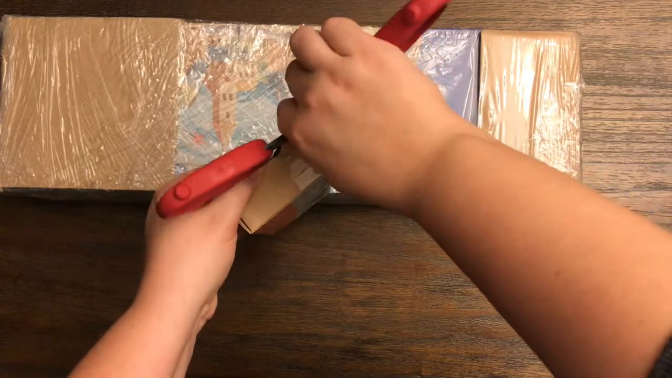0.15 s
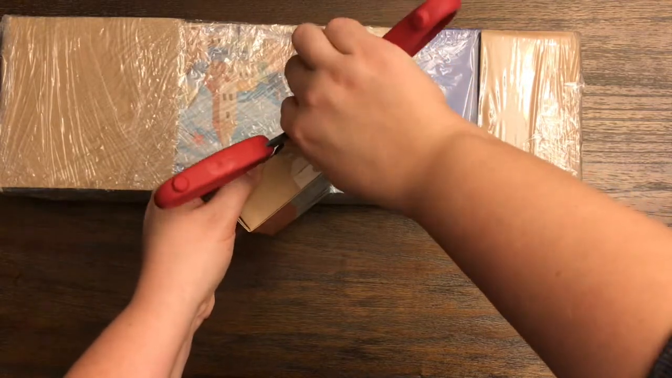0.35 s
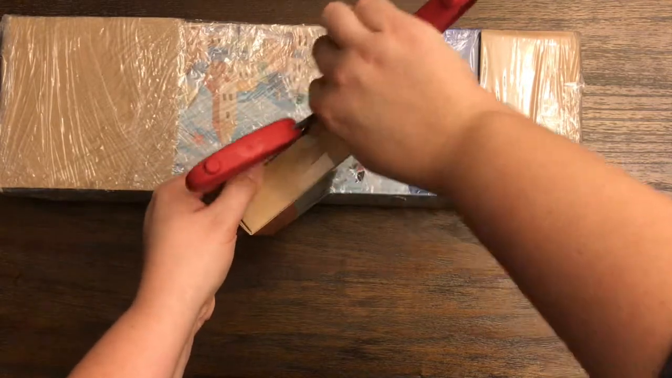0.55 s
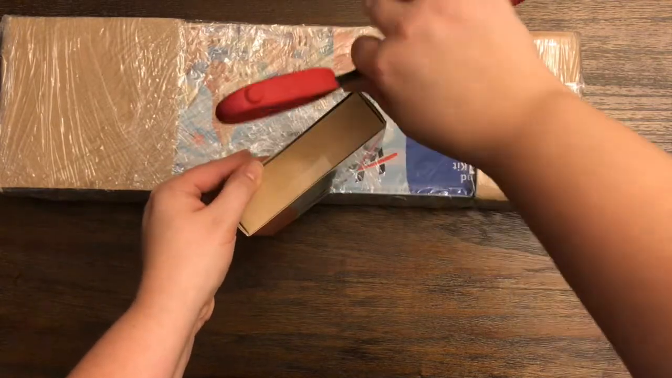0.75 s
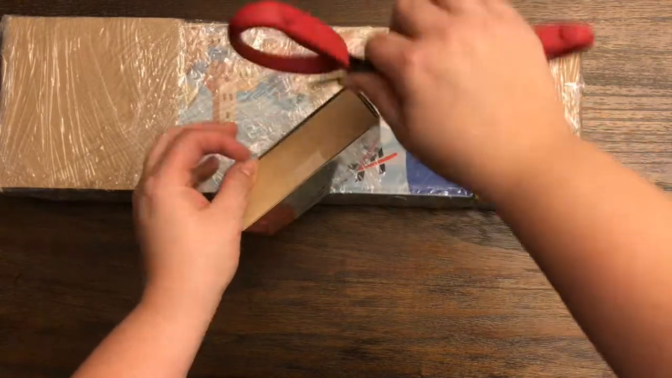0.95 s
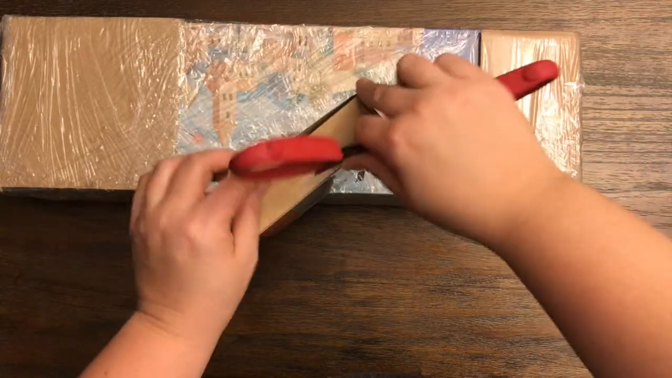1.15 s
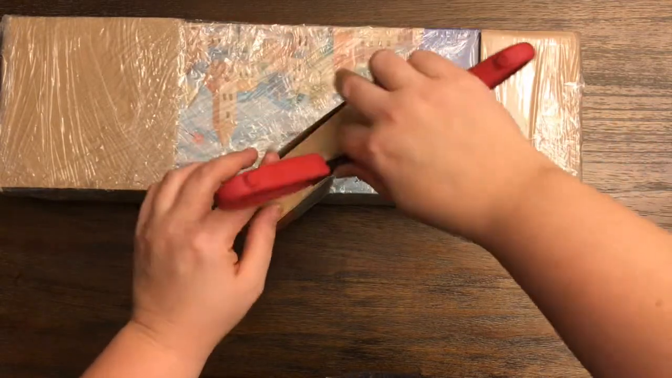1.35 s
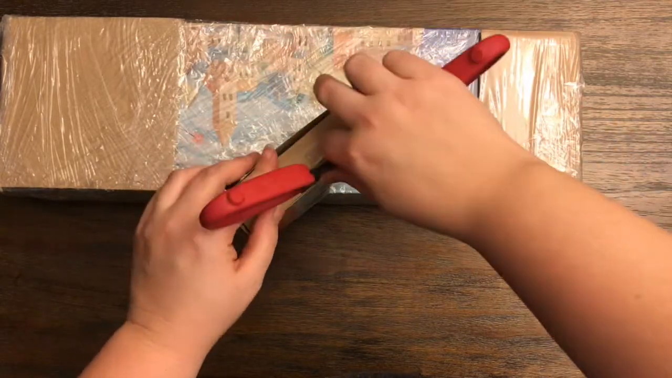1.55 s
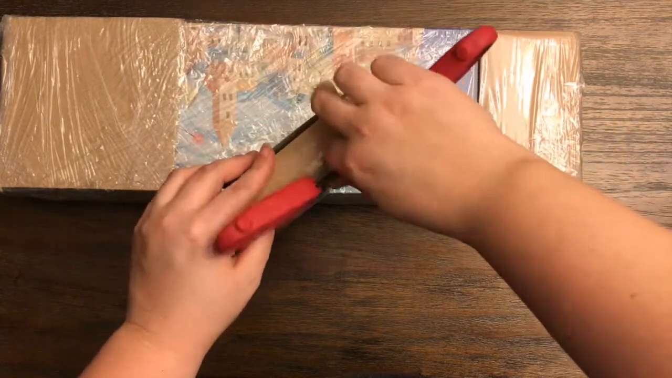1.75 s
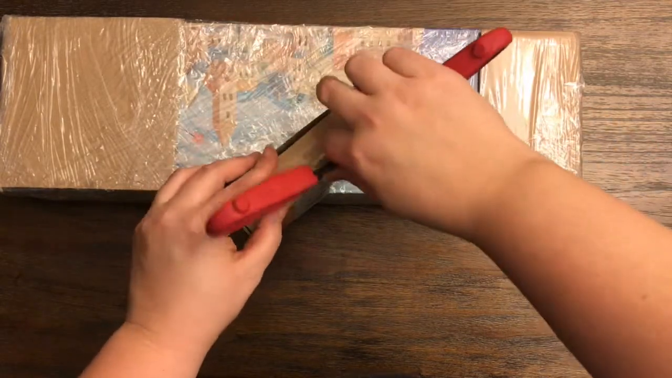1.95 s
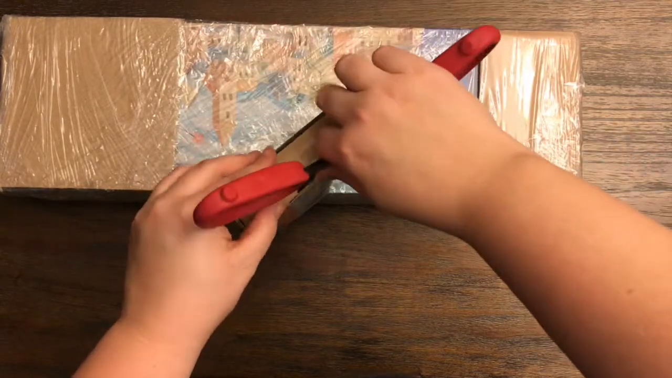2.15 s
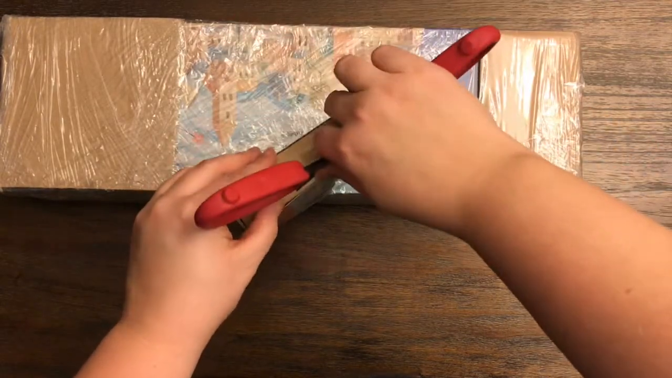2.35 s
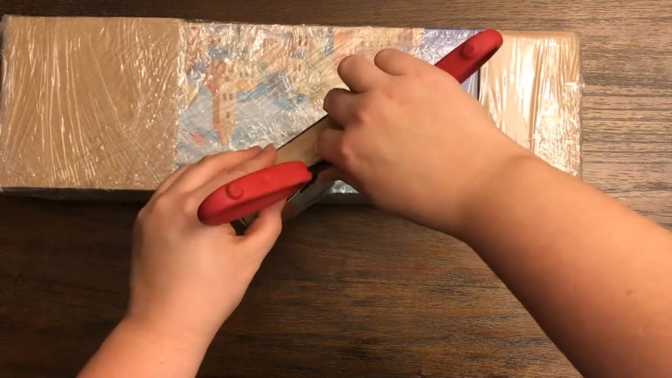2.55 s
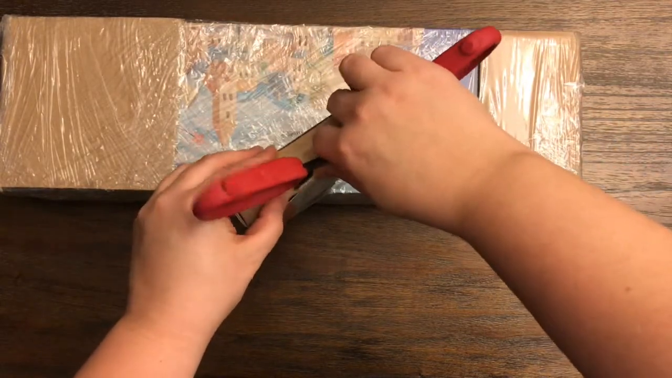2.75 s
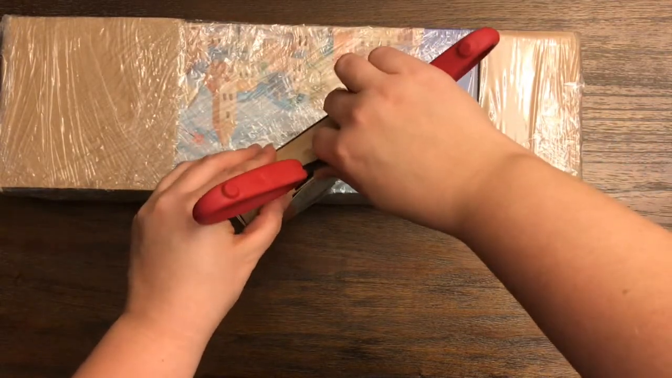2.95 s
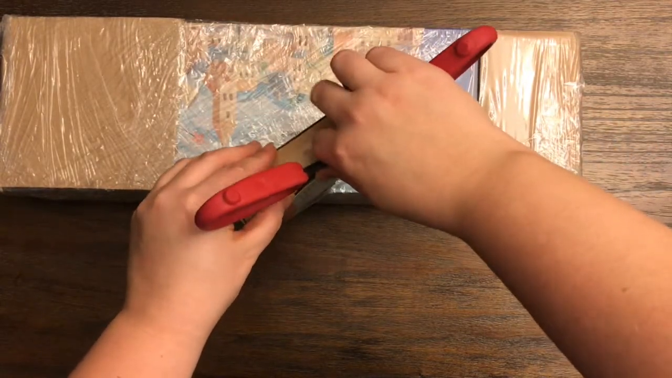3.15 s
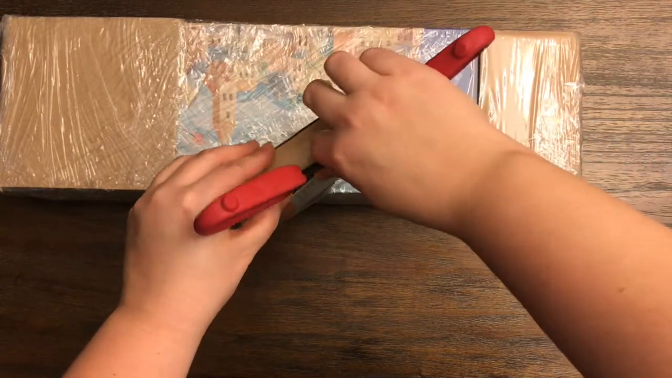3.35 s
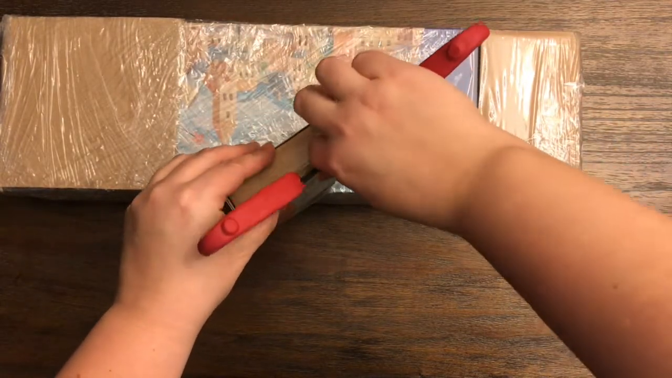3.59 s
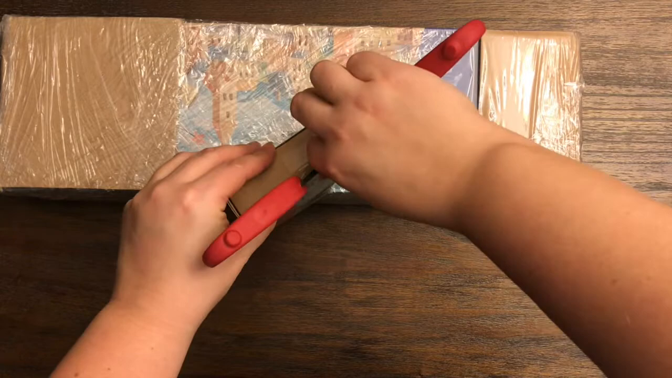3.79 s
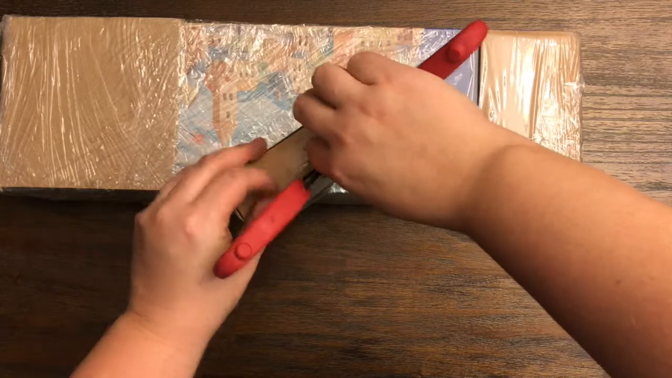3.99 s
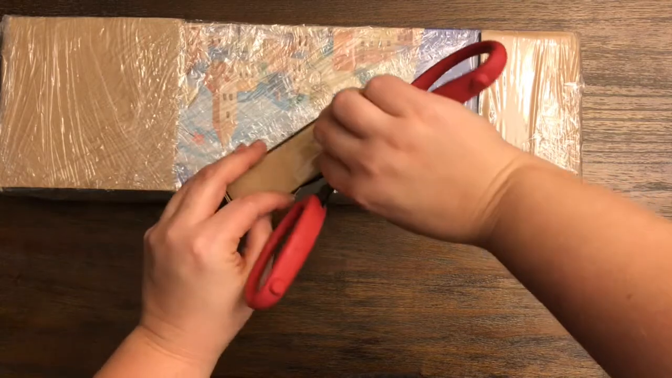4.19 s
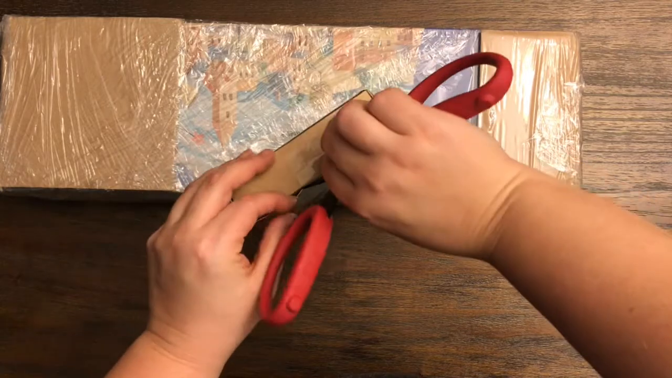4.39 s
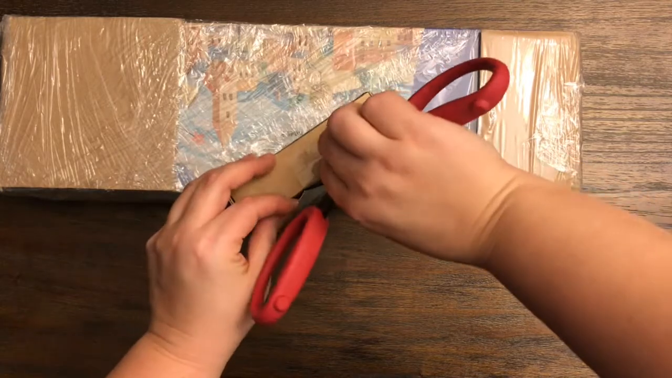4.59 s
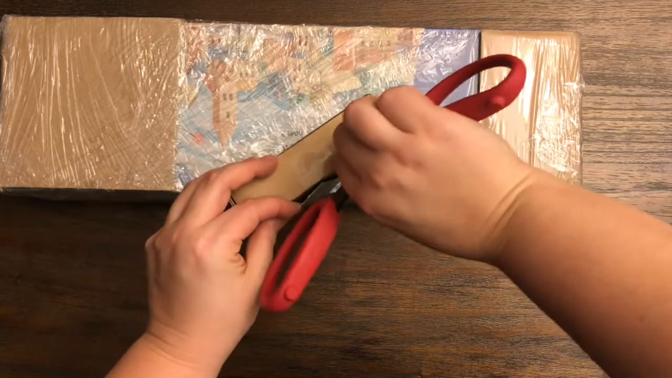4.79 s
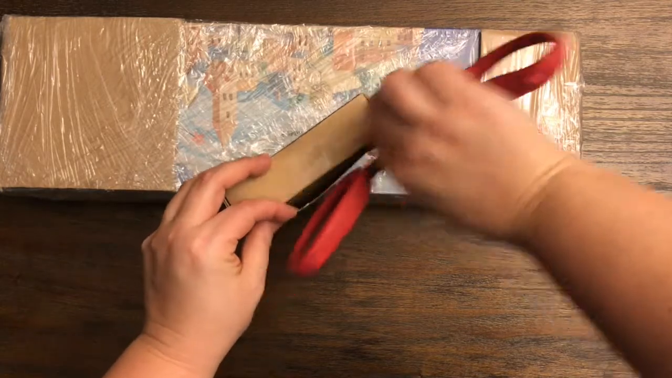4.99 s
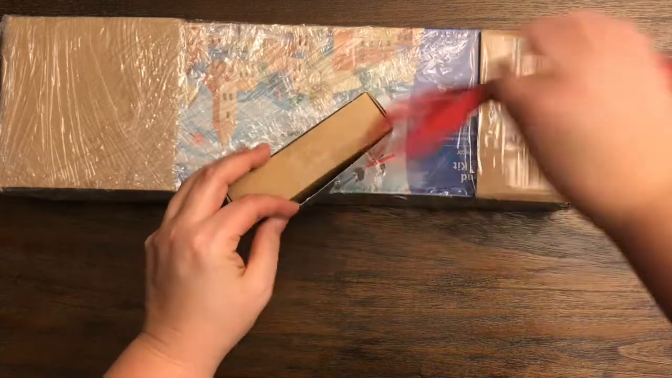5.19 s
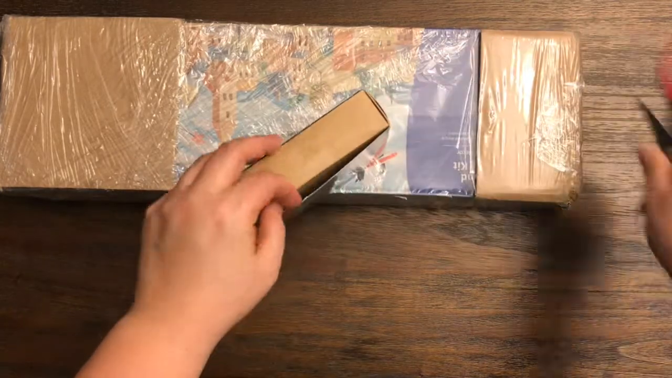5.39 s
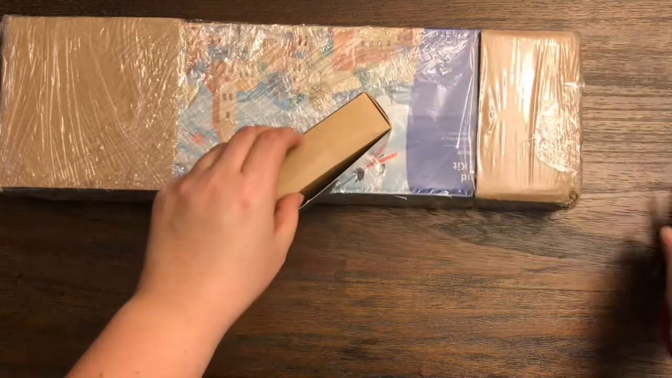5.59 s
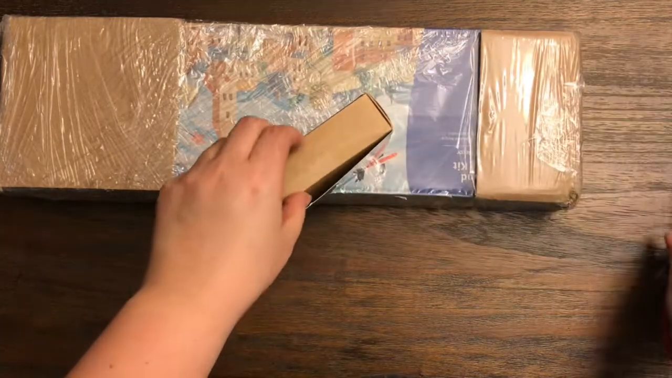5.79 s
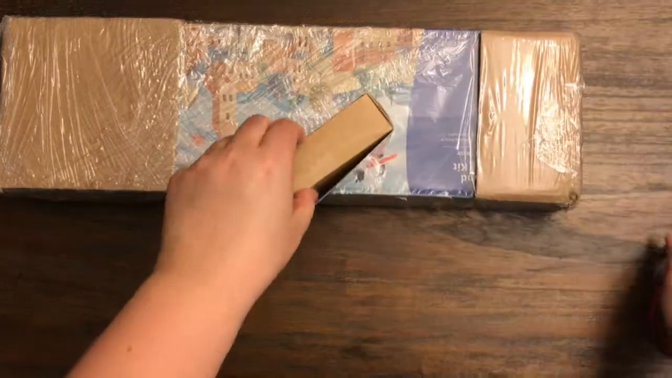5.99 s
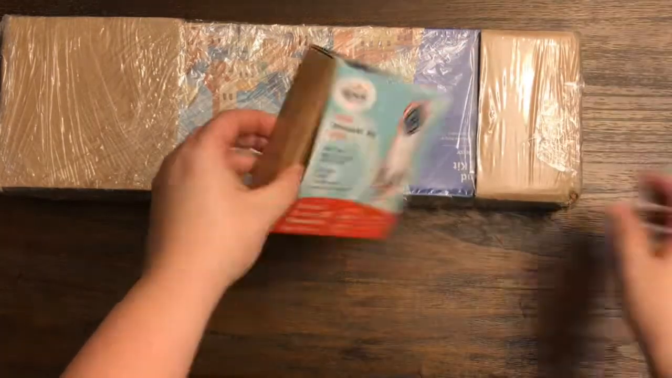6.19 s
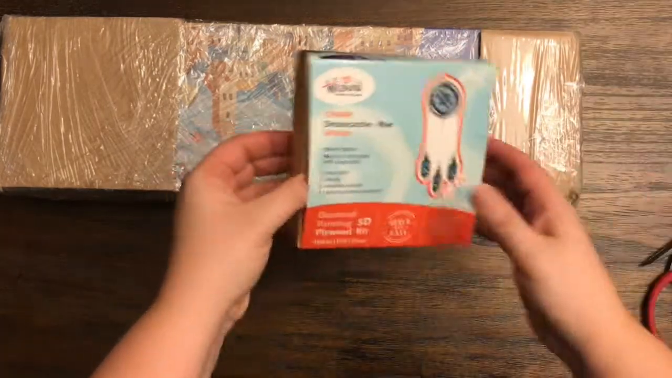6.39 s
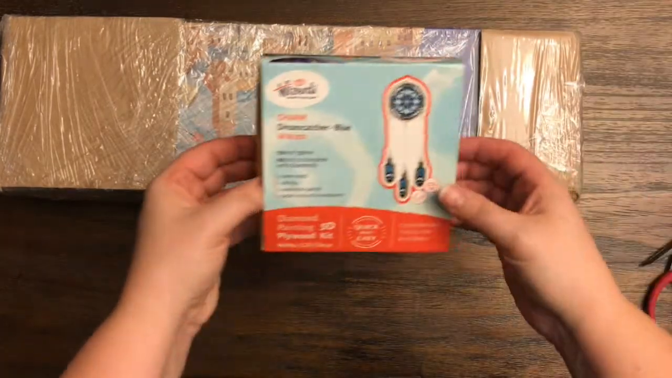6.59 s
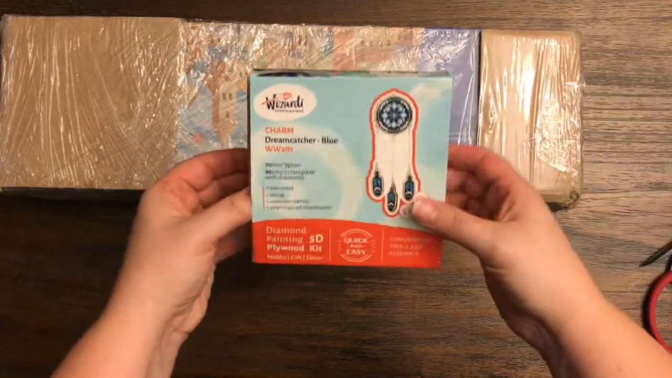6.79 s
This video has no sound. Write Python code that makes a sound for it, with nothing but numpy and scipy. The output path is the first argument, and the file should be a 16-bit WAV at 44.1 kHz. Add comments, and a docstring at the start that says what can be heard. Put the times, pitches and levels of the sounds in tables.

```python
"""A low appliance hum in a quiet room, then scissors close by, working through tape on a cardboard box.
Tape snaps and rasps as cracking noise and stick-slip jerks, the flap thuds and the blade rings as
decaying modes, and the blade squeaks as it is drawn out: jerks in a narrow, rising resonance.
Then the box is tipped up: it scuffs over the parcel beneath and its contents knock about.
Filtered noise makes the rustles, soft hiss and faint ticks; a diffuse noise tail makes the room."""
import sys
import numpy as np
from scipy import signal
from scipy.fft import rfft, irfft
from scipy.io import wavfile

SR = 44100
rng = np.random.default_rng(int(sys.argv[2]) if len(sys.argv) > 2 else 0)


def bounce(signal):
    """Save signal as a 16-bit WAV file at the path given by the first command-line argument."""
    frames = np.transpose(np.atleast_2d(signal))
    limited = np.clip(frames, -1, 1)
    pcm = np.round(limited * 32767).astype(np.int16)
    wavfile.write(sys.argv[1], SR, pcm)


N = 301672  # length in samples

# motor and mains hum together: f/Hz, level/dB rms
HUM = [(57.5, -59.5), (60, -69), (115, -65), (120, -73.5), (172.5, -74), (230, -83), (287.5, -108)]
# spectrum of the still air and hiss: f/Hz, relative level/dB per Hz
AIR = [(20, -25), (35, -11), (65, -6), (100, -7), (210, -13.5), (340, -13.5), (520, -24), (1000, -28),
       (1700, -31), (2200, -35.5), (2900, -37.5), (3800, -37), (5500, -41), (10500, -45.5), (12500, -41.5),
       (14500, -36.5), (15800, -36.5)]
AIR_DB = -59.5  # rms

# tape snaps and blade clicks: t/s, crack level/dB, flap thud level/dB, tick level/dB, favoured flap f/Hz
SNAPS = [(.166, -88, -55, -62.5, 197), (.4605, -62, -66, -58, 226), (.4645, -43, -37.5, -35, 226),
         (.4683, -39.5, -36, -32.5, 150), (.4701, -50, -39, -35, 187), (.6846, -39.5, -36.5, -40.5, 690),
         (.7868, -58, -74, -58.5, 180), (.9876, -64, -68, -55.5, 157), (1.039, -86, -80, -48, 141),
         (1.7259, -54, -52, -50.5, 188), (1.8416, -62, -58, -66, 130), (2.2272, -59, -48, -57, 524),
         (2.3612, -72, -66, -56, 130), (2.3655, -70, -61, -48.5, 130), (2.3731, -66, -72, -47.5, 130),
         (2.576, -58, -48, -53, 296), (2.8214, -78, -49, -58, 176), (3.055, -67, -51, -66, 205),
         (3.1042, -68, -60, -67.5, 200), (3.1965, -60, -58, -69, 270), (3.4374, -62.5, -58.5, -65.5, 560),
         (3.4645, -62.5, -53, -69, 570), (3.8734, -55, -56.5, -65, 397), (3.884, -62, -62, -81, 1000),
         (4.0119, -77, -68, -56.5, 170), (4.0453, -60, -68, -58.5, 130), (4.212, -60, -60, -70, 590),
         (4.222, -69, -69, -80, 700), (4.3291, -60, -59, -71, 160), (4.7595, -64, -44.5, -59, 201),
         (4.9885, -44, -37.5, -33, 620), (5.0195, -36, -30.5, -42, 452), (5.4156, -63, -57, -53.5, 130)]
# modes of the taped flap: f/Hz, level/dB, t60/s
FLAP_MODES = [(116, -10.5, 0.12), (138, -5.5, 0.082), (178.5, -5.5, 0.14), (211, 0.5, 0.045),
              (299, 1, 0.059), (400, 5.5, 0.026), (571, -0.5, 0.031), (618, 7, 0.013), (850, -3, 0.037),
              (1150, 5.5, 0.0054), (1470, 10.5, 0.01)]
# colour of cracking tape: f/Hz, level/dB
TAPE_CRACK = [(300, -61), (800, 9), (1150, 6.5), (1550, 10), (2300, 1), (3300, 3), (4300, -0.5),
              (6000, -31), (9000, -61)]
# colour of the fine ticking of edge and film: f/Hz, level/dB
TICK = [(2500, -12.5), (5000, -2), (6500, 1), (8200, -0.5), (9700, 0.5), (11000, -4), (12500, 0.5),
        (16000, -2)]
SNAP_T60_S, SNAP_TICK_T60_S = 0.032, 0.0088
BITE_S = 0.00033  # time constant of a blow's build-up
ROOM_T60_S, ROOM_TREBLE_T60_S, ROOM_DB = 0.47, 0.12, -15

# steel blade ringing as it jumps free: t/s, level/dB, strongest f/Hz
BLADE_RINGS = [(.4688, -38, 1480), (.6846, -46, 2300), (4.9895, -36.5, 3280), (5.004, -48, 3500)]
# modes of the blade: f/Hz, level/dB, t60/s
BLADE_MODES = [(1330, 3, 0.012), (1470, 3, 0.012), (2250, -4, 0.01), (3190, 2, 0.016), (3370, 2, 0.016),
               (3900, -1, 0.01), (4380, -1, 0.012), (6300, -4, 0.008)]

# edge biting and tape tearing on: t/s, length/s, crest as share of length, rasp level/dB,
# flap level/dB, favoured flap f/Hz
CUTS = [(0.472, 0.022, 0.16, -44.5, -34.5, 161), (0.501, 0.034, 0.37, -51, -40.5, 190),
        (0.688, 0.047, 0.16, -42, -43.5, 710), (2.642, 0.05, 0.1, -58.5, -55, 440),
        (3.18, 0.063, 0.44, -65, -52, 298), (4.756, 0.07, 0.32, -55, -51.5, 398),
        (5.017, 0.091, 0.12, -48, -53, 560)]
# hiss equals rasp at this level, and lags by this many dB for each dB less
CUT_BRIGHT_DB, CUT_DULLING = -49.5, 0.28

# soft hiss lingering after snips: t/s, length/s, level/dB
LINGER = [(0.49, 0.92, -62), (5.044, 1, -61.5)]
# colour of that hiss: f/Hz, level/dB per Hz
LINGER_COLOUR = [(400, -14), (1500, 8), (3500, 1.5), (6500, -1), (10000, -2.5), (16000, -5)]
LINGER_CREST_SHARE = 0.025  # of the length

# flat of the blade gliding over film: t/s, length/s, crest as share of length, hiss level/dB, flap level/dB
SLIDES = [(0.958, 0.12, 0.46, -63, -68), (1.219, 0.18, 0.57, -59.5, -68), (1.771, 0.034, 0.68, -59, -70),
          (2.327, 0.058, 0.5, -60.5, -75), (2.781, 0.08, 0.32, -76, -59), (3.439, 0.04, 0.32, -64, -61),
          (3.968, 0.028, 0.28, -62.5, -83), (3.978, 0.29, 0.25, -66, -60), (4.175, 0.072, 0.7, -62, -67),
          (4.22, 0.22, 0.23, -65.5, -56), (4.953, 0.094, 0.42, -49.5, -52), (5.039, 0.1, 0.91, -53.5, -71)]
SLIDE_RASP_DB, SLIDE_HZ = -1, 360  # rasp relative to hiss, favoured flap pitch

# film pushed aside: t/s, length/s, crest as share of length, level/dB, lower edge f/Hz, upper edge f/Hz
FILM_RUSTLES = [(1.18, 0.09, 0.88, -66.5, 2520, 4140), (1.226, 0.14, 0.24, -56.5, 7400, 14200),
                (1.27, 0.088, 0.18, -59, 2200, 7900), (1.461, 0.065, 0.08, -59.5, 1660, 3300),
                (2.35, 0.064, 0.23, -57, 6000, 9800), (2.643, 0.046, 0.078, -58.5, 1860, 4350),
                (4.235, 0.091, 0.3, -71, 2400, 3860), (6.46, 0.15, 0.26, -67, 2020, 3980)]
# colour of rustling film: f/Hz, level/dB
FILM_RUSTLE = [(1500, -3), (3000, -5.5), (6000, 1.5), (12000, 4), (16000, 1)]

# stiff tape buckling in quick crinkles: t/s, level/dB, strongest f/Hz
CRINKLES = [(1.4615, -61, 3000), (2.624, -60, 3800), (2.632, -70, 4200), (2.6455, -58, 3000),
            (2.654, -56, 3600), (2.661, -66, 1500)]
# modes of the buckling tape: f/Hz, level/dB, t60/s
FILM_MODES = [(864, 4, 0.13), (1535, 8, .035), (1800, -12, 0.024), (2190, 0, 0.053), (2430, 4, 0.028),
              (3080, -17, 0.02), (3390, -1, 0.035), (3900, -4, 0.029), (4300, -2, 0.033)]

# card and contents rustling: t/s, length/s, crest as share of length, level/dB,
# lower edge f/Hz, upper edge f/Hz
CARD_RUSTLES = [(1.773, 0.022, 0.74, -48.5, 200, 1130), (2.54, 0.069, 0.6, -53.5, 217, 800),
                (2.64, 0.056, 0.31, -62, 400, 2200), (4.195, 0.05, 0.38, -50, 254, 1700),
                (4.756, 0.084, 0.16, -45.5, 153, 1210), (4.957, 0.052, 0.86, -42.5, 149, 1400),
                (5.022, 0.062, 0.1, -46, 120, 900), (5.921, 0.078, 0.13, -40, 550, 3400),
                (5.993, 0.043, 0.16, -30, 590, 2490), (6.016, 0.06, 0.12, -29, 248, 2630),
                (6.055, 0.075, 0.36, -37.5, 240, 2360), (6.13, 0.088, 0.052, -40.5, 222, 1950),
                (6.195, 0.095, 0.17, -42.5, 153, 764)]
# colour of rustling card: f/Hz, level/dB
CARD_RUSTLE = [(120, -2), (210, 10), (300, 4), (480, -3), (690, 0), (1000, -7), (1350, -1), (1600, -8),
               (2000, -4.5), (3000, -15)]

# span of the stray ticks of strained tape: start t/s, end t/s
CRACKLE_S = (1.9, 4.9)
CRACKLE_PER_S, CRACKLE_DB, CRACKLE_SPREAD_DB = 6, -74, 1.5

# knocks of box and contents: t/s, crack level/dB, box thud level/dB, tick level/dB, struck wall f/Hz
KNOCKS = [(3.2042, -61.5, -40, -83, 330), (5.6995, -51, -44, -74, 260), (5.9201, -32, -33.5, -50, 170),
          (5.9399, -38, -52, -49, 1380), (5.955, -41, -58, -56, 1380), (5.9963, -45, -32.5, -48, 880),
          (6.0175, -36, -26, -41.5, 590), (6.0255, -50, -30.5, -42.5, 141), (6.039, -53, -30, -56, 330),
          (6.053, -60, -38, -61, 280), (6.0618, -54, -38, -60, 400), (6.0718, -59, -37, -51, 500),
          (6.0885, -55, -31.5, -43.5, 280), (6.105, -60, -35.5, -48.5, 456), (6.1315, -46, -33.5, -51, 410),
          (6.152, -55, -35.5, -64, 130), (6.1985, -55, -38.5, -74, 292), (6.228, -68, -42, -85, 288),
          (6.4487, -54, -51.5, -60.5, 516), (6.77, -59, -55.5, -58.5, 620)]
# modes of the whole box: f/Hz, level/dB, t60/s
BOX_MODES = [(108.5, -8, 0.17), (135, -1, 0.16), (207, -6, 0.09), (261, -1, 0.17), (280, 0, 0.17),
             (305, 0, 0.11), (376, -8, 0.11), (428, -5.5, 0.1), (525, -8, 0.09), (654, -2, 0.07),
             (674, -4, 0.07), (717, -4, 0.07), (755, -4, 0.06), (859, -2, 0.06), (947, -6, 0.05),
             (1066, -6, 0.03), (1167, -9, 0.07), (1237, -6, 0.08), (1335, -7, 0.04), (1481, -9, 0.025),
             (1674, -4, 0.018), (1900, -3, 0.018), (2200, -3, 0.015)]
# colour of cracking card fibre: f/Hz, level/dB
CARD_CRACK = [(300, 8.5), (700, -7), (1250, 17), (1900, 4.5), (2400, 7.5), (3100, 5), (3900, 1.5),
              (5000, -9.5), (6500, -4), (10000, -87)]
KNOCK_T60_S, KNOCK_TICK_T60_S = 0.05, 0.042

# blade squeaking out of the slit: start t/s, crest t/s, end t/s
SQUEAK_S = (5.07, 5.138, 5.146)
SQUEAK_FROM_HZ, SQUEAK_TO_HZ, SQUEAK_WIDTH_HZ, SQUEAK_DB = 2880, 3120, 820, -46
SQUEAK_HISS_DB = -15  # relative to the squeak

# box scuffing over parcel and fingers: t/s, length/s, rasp level/dB, box level/dB, favoured wall f/Hz
SCUFFS = [(5.41, 0.25, -65, -60, 330), (5.693, 0.089, -58, -48, 400), (5.916, 0.08, -44, -39, 200),
          (6.016, 0.094, -48, -36, 300), (6.129, 0.17, -63, -39, 240), (6.455, 0.25, -62, -61, 393),
          (6.783, 0.11, -59.5, -56.5, 405)]
SCUFF_CREST_SHARE, SCUFF_HISS_DB = 0.029, -9  # share of the length, hiss relative to rasp

TOP_HZ = 15900  # upper edge of the final sound


def undb(db):
    """Decibels to gain."""
    return 10 ** (np.asarray(db) / 20)


def unit(x):
    """Scale to an rms of 1."""
    return x / np.sqrt(np.mean(x ** 2))


def clock(seconds):
    """Sample times from zero."""
    return np.arange(int(seconds * SR)) / SR


def fade(t, t60):
    """Exponential decay, 60 dB down at t60."""
    return np.exp(-np.log(1000) * t / max(t60, 1e-3))


def add(track, start, x):
    """Mix a sound into the track at a time in seconds."""
    i = max(int(start * SR), 0)
    track[i:i + len(x)] += x[:max(len(track) - i, 0)]


def add_hit(track, start, x, db):
    """Mix in a hit whose level is its energy spread over a hundredth of a second."""
    window = .01 * SR
    add(track, start, x * undb(db) * np.sqrt(window / np.sum(x ** 2)))


def colour(x, points, patchy_db=0):
    """Shape a steady noise by (f/Hz, level/dB) points, rms 1; patchiness adds one contact's chance resonances."""
    hz, db = np.transpose(points)
    octave = np.log2(np.maximum(np.fft.rfftfreq(len(x), 1 / SR), 1))
    knots = np.arange(0, 15, 1 / 7)  # seven to the octave
    patches = np.interp(octave, knots, rng.standard_normal(len(knots)))
    shape_db = np.interp(octave, np.log2(hz), db) + patchy_db * patches
    return unit(irfft(rfft(x) * undb(shape_db), len(x)))


def contact(x, crack_colour):
    """Split a contact's excitation into the crack of fibre and the bright tick of edge and film."""
    return colour(x, crack_colour, patchy_db=1.2), colour(x, TICK, patchy_db=.6)


def ring(modes, pitch_hz, focus_db, scatter_db=2.5, detune=0.01):
    """Decaying modes after one tap: those near one pitch are favoured, and each contact detunes them anew."""
    t = clock(.25)
    chance = rng.standard_normal((len(modes), 3))
    out = np.zeros(len(t))
    for (hz, db, t60), (sign, weight, shift) in zip(modes, chance):
        octaves_away = abs(np.log2(hz / pitch_hz))
        gain = undb(db + scatter_db * weight - focus_db * octaves_away)
        tone = np.sin(2 * np.pi * hz * (1 + detune * shift) * t)
        out += np.sign(sign) * gain * tone * fade(t, t60)
    return out


def swell(start, crest, end, rise_db=12, fall_db=17, edge_s=0.00036):
    """Pressure of a stroke: it builds to a crest, then eases until contact is lost."""
    t = start + clock(max(end - start, .01))
    db = np.interp(t, [start, np.clip(crest, start, t[-1]), t[-1]], [-rise_db, 0, -fall_db])
    edges = np.clip(np.minimum(t - start, t[-1] - t) / edge_s, 0, 1)
    return undb(db) * edges


def slips(rate, spread_db):
    """A second of stick-slip: tiny jerks at random moments, a few much larger than the rest."""
    jerks = (rng.random(SR) < rate / SR) * rng.choice([-1, 1], SR)  # rate in jerks per second
    return jerks * undb(spread_db * np.minimum(rng.exponential(size=SR), 4))


def catching(size, rate=160, depth_db=2.8):
    """A sliding edge keeps catching and letting go, so its pressure flutters."""
    steps = np.arange(size) * rate / SR
    return undb(depth_db * np.interp(steps, np.arange(SR), rng.standard_normal(SR)))


def blows(table, modes, crack_colour, crack_t60, tick_t60, focus_db):
    """Each blow is a burst of cracking fibre, a shorter bright tick and a thud of the cardboard behind it."""
    out, t = np.zeros(N), clock(.2)
    bite = 1 - np.exp(-t / BITE_S)
    for start, crack_db, thud_db, tick_db, pitch_hz in table:
        fibre, edge = contact(rng.standard_normal(len(t)), crack_colour)
        add_hit(out, start, ring(modes, pitch_hz, focus_db), thud_db)
        add_hit(out, start, fibre * bite * fade(t, crack_t60), crack_db)
        add_hit(out, start, edge * bite * fade(t, tick_t60), tick_db)
    return out


def strikes(table, modes, focus_db):
    """Each sharp contact sets the same modes ringing, strongest near its own pitch."""
    out = np.zeros(N)
    for start, db, pitch_hz in table:
        add_hit(out, start, ring(modes, pitch_hz, focus_db, scatter_db=1.5, detune=.008), db)
    return out


def rub(start, length, crest_share, rasp_db, hiss_db, body_db, body, rasp_colour, rate, grit_db):
    """Stick-slip jerks rasp and hiss at the contact and keep the cardboard ringing."""
    out, jerks = np.zeros(N), slips(rate, grit_db)
    stroke = swell(start, start + crest_share * length, start + length)
    size = len(stroke)
    pressure = stroke * catching(size)
    rasp, hiss = contact(jerks, rasp_colour)
    surface = undb(rasp_db) * unit(rasp[:size]) + undb(hiss_db) * unit(hiss[:size])
    add(out, start, pressure * surface)
    drone = signal.fftconvolve(pressure * jerks[:size], body)
    # the drone carries as much energy as the pressure curve, before its level
    add(out, start, undb(body_db) * drone * np.sqrt(np.sum(pressure ** 2) / np.sum(drone ** 2)))
    return out


def rustles(table, points, rate, grit_db):
    """Countless small contacts merge into a grainy rush, each rustle in its own band."""
    out = np.zeros(N)
    for start, length, crest_share, db, low_hz, high_hz in table:
        stroke = swell(start, start + crest_share * length, start + length)
        top_hz = np.clip(high_hz, low_hz * 2 ** .5, SR / 2 - 1)  # at least half an octave wide
        band = signal.butter(4, [low_hz, top_hz], "bandpass", fs=SR, output="sos")
        grains = signal.sosfilt(band, colour(slips(rate, grit_db), points))[-len(stroke):]
        add(out, start, undb(db) * stroke * unit(grains * catching(len(stroke))))
    return out


def background():
    """An appliance hums as steady sine partials over soft, coloured room noise and hiss."""
    t = np.arange(N) / SR
    hum = np.zeros(N)
    for hz, db in HUM:
        hum += np.sqrt(2) * undb(db) * np.sin(2 * np.pi * (hz * t + rng.random()))
    return hum + undb(AIR_DB) * colour(rng.standard_normal(N), AIR)


def snaps():
    """The tape gives way under the blade: crack, tick and a thud of the flap."""
    return blows(SNAPS, FLAP_MODES, TAPE_CRACK, SNAP_T60_S, SNAP_TICK_T60_S, focus_db=7.5)


def room(x, split_hz=5000, gap_s=0.00081, treble_db=-4):
    """A diffuse tail from the walls, its treble dying sooner."""
    t = clock(.9)
    noise = rng.standard_normal(len(t))
    low = signal.sosfilt(signal.butter(1, split_hz, fs=SR, output="sos"), noise)
    treble = undb(treble_db) * (noise - low)
    tail = low * fade(t, ROOM_T60_S) + treble * fade(t, ROOM_TREBLE_T60_S)
    tail *= t > gap_s
    return undb(ROOM_DB) * signal.fftconvolve(x, tail / np.sqrt(np.sum(tail ** 2)))[:N]


def blade_rings():
    """The steel blade rings briefly in its own modes as it jumps free."""
    return strikes(BLADE_RINGS, BLADE_MODES, focus_db=8.0)


def cuts():
    """A cut bites early and runs out in stick-slip; the louder its rasp, the brighter."""
    out = np.zeros(N)
    for start, length, crest_share, rasp_db, flap_db, pitch_hz in CUTS:
        hiss_db = rasp_db - CUT_DULLING * (CUT_BRIGHT_DB - rasp_db)
        flap = ring(FLAP_MODES, pitch_hz, focus_db=5.5)
        out += rub(start, length, crest_share, rasp_db, hiss_db, flap_db, flap, TAPE_CRACK,
                   rate=2600, grit_db=1.0)
    return out


def lingering_hiss():
    """A smooth, airy noise swells quickly and fades slowly."""
    out, air = np.zeros(N), colour(rng.standard_normal(N), LINGER_COLOUR)
    for start, length, db in LINGER:
        add(out, start, undb(db) * swell(start, start + LINGER_CREST_SHARE * length, start + length))
    return out * air


def slides():
    """The gliding blade slips over the film, swelling and fading, with more hiss than rasp."""
    out = np.zeros(N)
    for start, length, crest_share, hiss_db, flap_db in SLIDES:
        flap = ring(FLAP_MODES, SLIDE_HZ, focus_db=3.0)
        out += rub(start, length, crest_share, hiss_db + SLIDE_RASP_DB, hiss_db, flap_db, flap, TAPE_CRACK,
                   rate=3200, grit_db=2.2)
    return out


def film_rustles():
    """The film rustles in dense small slips as it is pushed aside."""
    return rustles(FILM_RUSTLES, FILM_RUSTLE, rate=2600, grit_db=3.0)


def crinkles():
    """Stiff tape buckles, and each crinkle sets its modes ringing."""
    return strikes(CRINKLES, FILM_MODES, focus_db=6.5)


def card_rustles():
    """Card and contents rustle in coarser slips as the box is gripped and tipped."""
    return rustles(CARD_RUSTLES, CARD_RUSTLE, rate=1300, grit_db=3.2)


def crackle():
    """Strained tape lets go in faint, scattered ticks of decaying noise."""
    out, t = np.zeros(N), clock(.02)
    count = int(CRACKLE_PER_S * (CRACKLE_S[1] - CRACKLE_S[0]))
    for start, size in zip(rng.uniform(*CRACKLE_S, count), rng.standard_normal(count)):
        tick = colour(rng.standard_normal(len(t)), TICK, patchy_db=4) * fade(t, SNAP_TICK_T60_S)
        add(out, start, undb(CRACKLE_DB + CRACKLE_SPREAD_DB * size) * unit(tick))
    return out


def knocks():
    """The box bumps on the parcel and its contents tumble: crack, tick and a thud of the walls."""
    return blows(KNOCKS, BOX_MODES, CARD_CRACK, KNOCK_T60_S, KNOCK_TICK_T60_S, focus_db=7.5)


def squeak():
    """The blade chatters against the tape in one narrow, rising resonance and hisses until it comes free."""
    out, pressure = np.zeros(N), swell(*SQUEAK_S)
    size = len(pressure)
    # shift the gliding pitch down to zero, low-pass there, and shift it back up
    turn = np.exp(2j * np.pi * np.cumsum(np.linspace(SQUEAK_FROM_HZ, SQUEAK_TO_HZ, size)) / SR)
    narrow = signal.butter(2, SQUEAK_WIDTH_HZ / 2, fs=SR, output="sos")
    chatter = np.real(turn * signal.sosfilt(narrow, slips(1900, 1.3)[:size] / turn))
    hiss = colour(slips(2390, 1.7), TICK)[:size]
    add(out, SQUEAK_S[0], undb(SQUEAK_DB) * pressure * (unit(chatter) + undb(SQUEAK_HISS_DB) * hiss))
    return out


def scuffs():
    """Card drags over film and skin in sparse, uneven slips, dull and gritty."""
    out = np.zeros(N)
    for start, length, rasp_db, box_db, pitch_hz in SCUFFS:
        wall = ring(BOX_MODES, pitch_hz, focus_db=2.0)
        out += rub(start, length, SCUFF_CREST_SHARE, rasp_db, rasp_db + SCUFF_HISS_DB, box_db, wall, CARD_CRACK,
                   rate=1400, grit_db=3.5)
    return out


def scene():
    """Scissors, then the box, in the room, over the hum."""
    scissors = snaps() + blade_rings() + cuts() + slides() + squeak()
    tape = film_rustles() + crinkles() + crackle()
    box = card_rustles() + knocks() + scuffs()
    direct = scissors + tape + box
    return (direct + room(direct) + lingering_hiss() + background())[None]


def record(dry):
    """Thin the deep bass with a high-pass and cut the top with a steep low-pass."""
    thinned = signal.sosfilt(signal.butter(2, 40, "highpass", fs=SR, output="sos"), dry)
    return signal.sosfilt(signal.ellip(10, .2, 70, TOP_HZ, fs=SR, output="sos"), thinned)


dry = scene()
out = record(dry)
bounce(out)
```